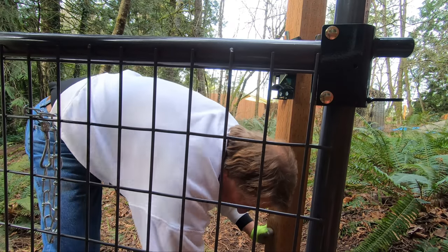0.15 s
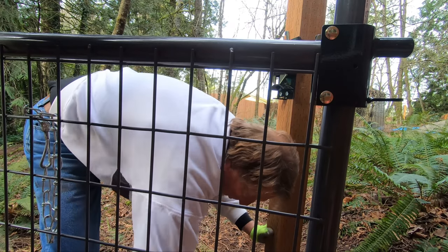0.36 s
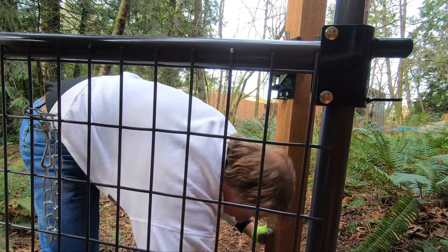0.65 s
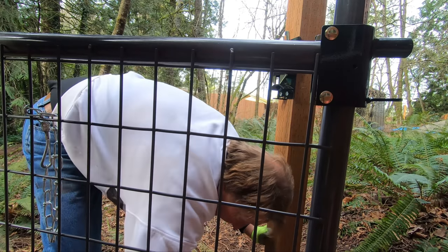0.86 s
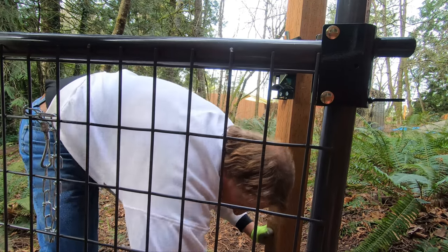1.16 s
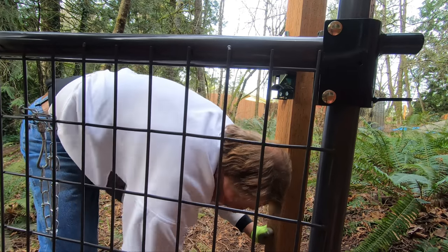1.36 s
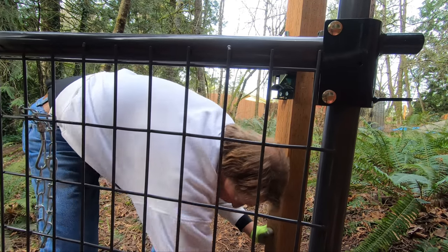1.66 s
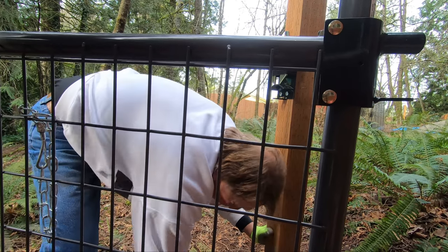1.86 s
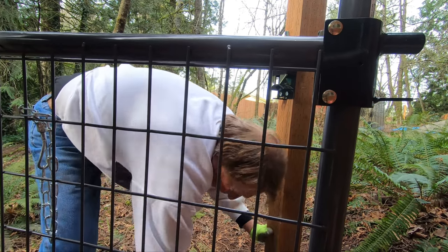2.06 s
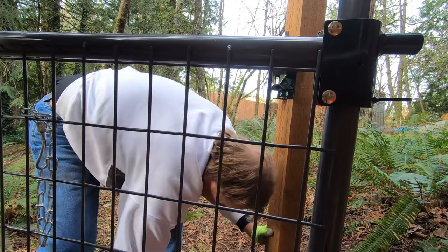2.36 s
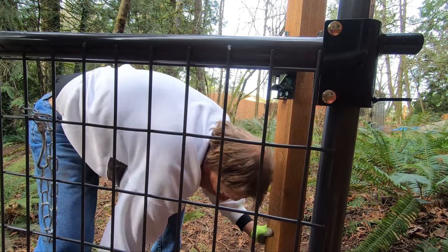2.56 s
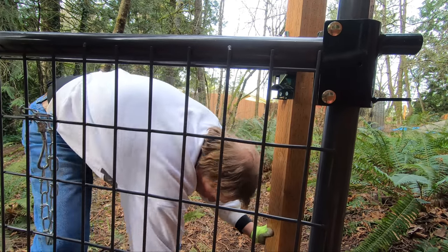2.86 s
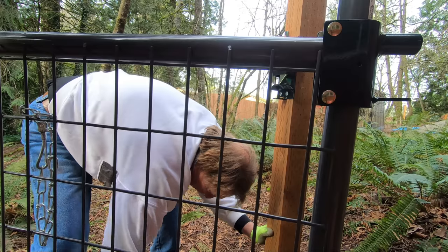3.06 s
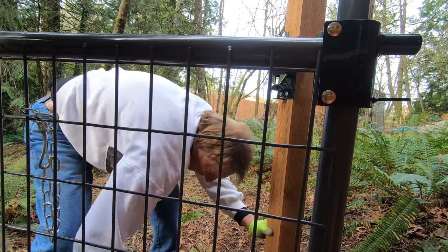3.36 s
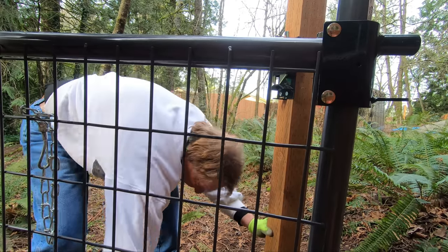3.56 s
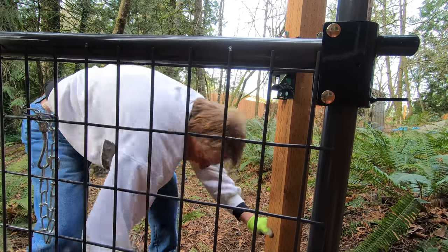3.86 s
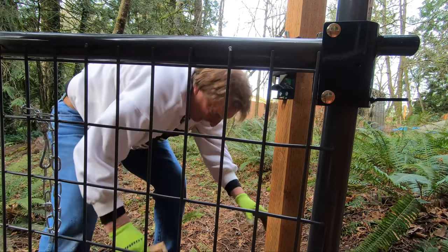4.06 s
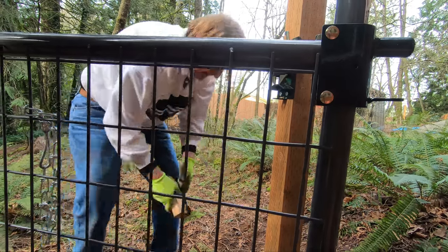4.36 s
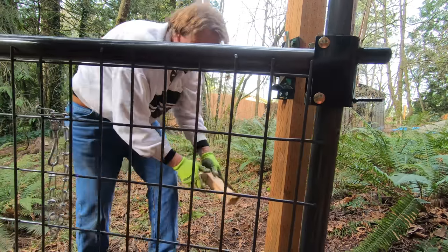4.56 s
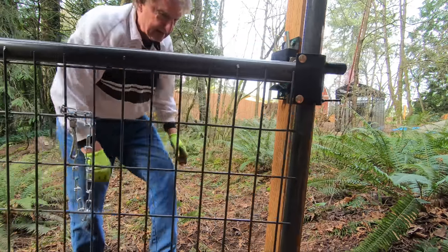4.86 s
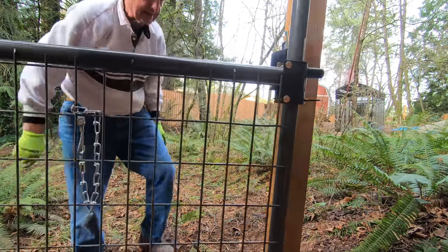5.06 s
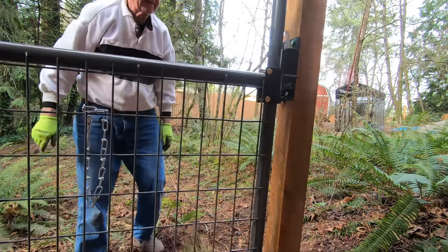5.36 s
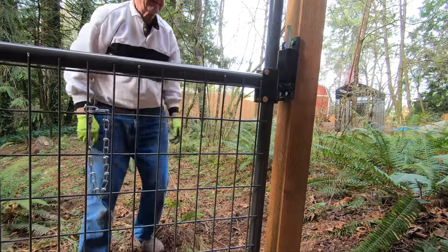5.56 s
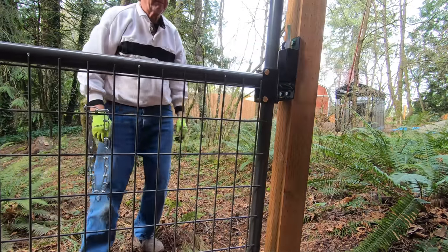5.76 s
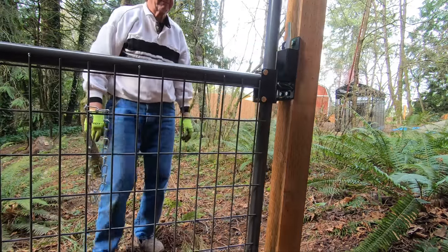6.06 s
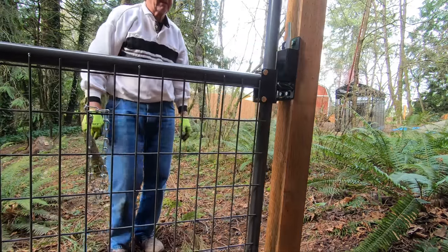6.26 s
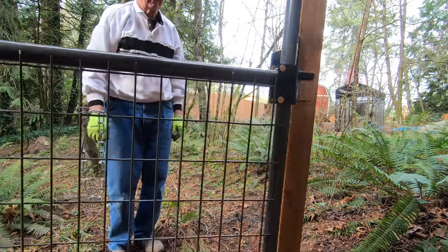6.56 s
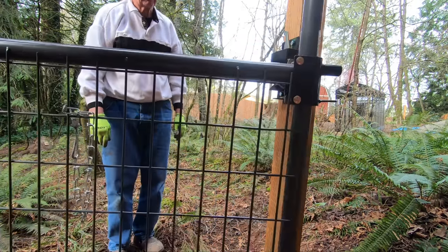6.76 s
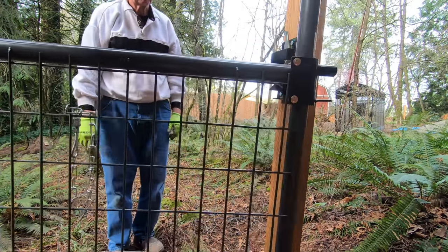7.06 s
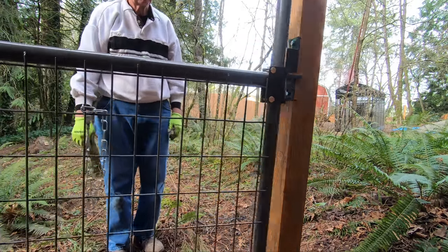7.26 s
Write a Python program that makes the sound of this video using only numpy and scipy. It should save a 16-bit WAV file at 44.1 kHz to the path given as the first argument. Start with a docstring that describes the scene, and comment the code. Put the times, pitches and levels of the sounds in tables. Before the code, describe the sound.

Outdoors, close to the latch of a steel tube and mesh gate, with low rumble and a faint far road behind. From 0 to 1 s dry leaves rustle and twigs snap; a wooden tap at 0.9 is followed at 1.2 by a solid wood knock and metal clank, ringing through tubes and mesh. Between about 1.6 and 4.9 s a distant engine drone gently climbs in pitch, with soft rustles, small snaps and faint wood taps over it. A light steel clink rings at 4.5, then a duller wood-and-metal knock at 4.9. At 5.4 the gate bangs loudly and bounces; from 5.9 to 6.1 the bolt rattles in rapid clacks. It scrapes from 6.4 into a heavy clack at 6.5, twangs brightly at 6.85, ticks lightly, and slams hard at 7.37, cut off while ringing.

```python
"""A steel tube gate with wire mesh outdoors, heard close to its latch; a low rumble and a faint road lie behind.
Someone rustles in dry leaves and knocks on a wooden block; early on the frame is struck, then an engine drones
upward in pitch far off. The block comes free, the gate swings shut and bounces, the bolt rattles over the catch,
scrapes back and clacks, slips off with a twang, and the gate slams. Each steel blow is a noisy clack plus ringing
tubes, bolt and mesh; wood is damped tones and cracks, leaves are grains of noise, the engine is a gliding sine."""
import sys
import numpy as np
from scipy import signal
from scipy.fft import rfft, irfft, next_fast_len
from scipy.io import wavfile
from scipy.ndimage import uniform_filter1d, map_coordinates

SR = 44100
rng = np.random.default_rng(int(sys.argv[2]) if len(sys.argv) > 2 else 0)


def dump_mix(stems):
    """Bounce the given channels to the path in sys.argv[1] as a 16-bit WAV at rate SR."""
    frames = np.atleast_2d(stems).T  # one column per channel
    limited = np.clip(frames, -1, 1)  # hard clip at full scale
    pcm = np.round(limited * 32767).astype(np.int16)
    wavfile.write(sys.argv[1], SR, pcm)


N = 326869  # length in samples

# The two microphone ports: how alike they hear each pitch.
# Each row: frequency in Hz, likeness from 0 to 1.
PORT_LIKENESS = [(100, .99), (300, .96), (800, .78), (1800, .76), (2600, .9), (3600, .86), (5000, .54),
                 (8000, .1)]
# How much louder the left port is. Each row: frequency in Hz, left minus right in dB.
PORT_LEAN = [(200, 0), (800, 1.6), (1800, 1.7), (3200, 0), (5000, -4.5), (9000, -3), (14000, -2)]
# How far the left port is ahead. Each row: frequency in Hz, phase lead in radians.
PORT_LEAD = [(200, 0), (800, -.15), (1800, -.33), (3200, .1), (5000, .5), (9000, 1.5)]
# Colour of dry leaves and twigs. Each row: frequency in Hz, relative strength in dB per Hz.
LEAF_COLOUR = [(470, -14), (800, -0.5), (1070, -6), (1280, -3.5), (1460, -6), (2040, -5), (2500, -8.5),
               (4670, -9), (6780, -8), (8020, -20), (9610, -16.5), (14100, -36)]


def amp(db):
    """Turn decibels into a gain."""
    return 10 ** (np.asarray(db) / 20)


def unit(x):
    """Scale a signal to rms 1."""
    return x / np.sqrt(np.mean(x ** 2) + 1e-20)


def along(points, hz):
    """Read (Hz, value) points at any frequency, on a log axis as the ear spaces pitch."""
    f, v = np.transpose(points)
    return np.interp(np.log(hz + 1), np.log(f + 1), v)


def curve(rows):
    """Join (seconds, value) points by straight lines, one value per sample."""
    return np.interp(np.arange(N) / SR, *np.transpose(rows))


def wobble(rate):
    """A smooth random curve with this many random points a second."""
    knots = rng.standard_normal(int(N * rate / SR) + 4)
    return map_coordinates(knots, [np.arange(N) * rate / SR], order=2)


def filtered(x, response):
    """Multiply the spectrum of x by a response that depends on frequency."""
    n = x.shape[-1]
    m = next_fast_len(n + 2048, True)
    return irfft(rfft(x, m) * response(np.fft.rfftfreq(m, 1 / SR)), m)[..., :n]


def port_place(hz, extra_lead=0):
    """Level and phase at the left and right port, each taking half of the difference."""
    half = np.array([[.5], [-.5]])
    return amp(half * along(PORT_LEAN, hz)) * np.exp(1j * half * (along(PORT_LEAD, hz) + extra_lead))


def ports(pair, spectrum, tilt_db=0):
    """Two unrelated signals blend into one coloured sound of rms 1, as two nearby ports hear it."""
    def colour(hz):
        # the less alike the ports, the more of the second signal
        turn = np.arccos(np.clip(along(PORT_LIKENESS, hz), 0, 1)) / 2
        tilt = tilt_db * np.log2(np.maximum(hz, 1200) / 2200)
        return amp(along(spectrum, hz) + tilt) * [np.cos(turn), np.sin(turn)]
    mid, side = filtered(pair, colour)
    return unit(filtered(np.array([mid + side, mid - side]), port_place))


def noise(spectrum, size, tilt_db=0):
    """Coloured stereo noise of rms 1."""
    return ports(rng.standard_normal((2, size)), spectrum, tilt_db)


def dying(t, t60, attack):
    """A quick rise, then an exponential decay that falls 60 dB in t60 seconds."""
    return amp(-60 * t / max(t60, 1e-3)) * (1 - np.exp(-t / attack))


def add(track, s, sound):
    """Mix a sound into the track at s seconds, trimming what lies outside."""
    start = round(s * SR)
    sound = sound[..., max(-start, 0):]
    part = track[..., max(start, 0):][..., :sound.shape[-1]]
    part += sound[..., :part.shape[-1]]


def during(start, end, fade):
    """Full level from start to end, fading exponentially on either side."""
    t = np.arange(N) / SR
    outside = np.maximum(start - t, 0) + np.maximum(t - end, 0)
    return np.exp(-outside / fade)


def patchy(x, depth_db):
    """Gain that varies at random over patches of time and frequency."""
    z = signal.stft(x, nperseg=256)[2]
    field = rng.standard_normal(z.shape[1:])
    field = uniform_filter1d(field, size=5, axis=0)
    field = uniform_filter1d(field, size=8, axis=1)
    return signal.istft(z * amp(depth_db * unit(field)), nperseg=256)[1][:, :N]


def distance():
    """Low rumble, a far road and still air in the trees, each a coloured noise."""
    # Three colours. Each row: frequency in Hz, relative strength in dB per Hz.
    rumble_colour = [(12, -25.5), (20, -16.5), (59, 0.5), (79, 1.5), (97, -6), (135, -8), (146, -8),
                     (173, -10.5), (200, -10.5), (260, -23.5), (440, -120)]
    road_colour = [(76, -44), (130, 0), (177, -15), (214, -1.5), (280, 0), (377, -7.5), (442, -4),
                   (508, -13.5), (671, -13), (1400, -40.5), (1820, -68), (3080, -120)]
    air_colour = [(290, -42), (500, -20), (739, -2.5), (1090, -38), (1660, -21), (2490, -41), (7020, -35),
                  (14100, -68)]
    # Two levels over time. Each row: time in seconds, level in dB.
    rumble_level = [(0, -46.5), (1.3, -45), (4.4, -46.5), (5.6, -50.5), (6.6, -46)]
    road_level = [(0, -48.5), (.35, -47.5), (.85, -42), (1.19, -43), (1.55, -51.5), (2.6, -56.5),
                  (4.8, -53.5), (5.15, -47.5), (7.41, -57.5)]
    rumble = amp(curve(rumble_level)) * noise(rumble_colour, N) * amp(0.65 * wobble(5))
    road = amp(curve(road_level)) * noise(road_colour, N)
    return rumble + road + amp(-67.5) * noise(air_colour, N)


def drone(hz, db):
    """A far, low sine tone whose level wavers on its way through the air."""
    waver_db = 2 * wobble(4.7)
    phase = 2 * np.pi * np.cumsum(hz) / SR
    return np.sqrt(2) * amp(db + waver_db) * np.sin(phase)


def engine():
    """A far engine gains speed, so its tone climbs, as it nears and recedes; a steadier hum joins for a while."""
    # The pitch climbs fastest near 2.3 to 3.1 s, then levels off. Each row: time in seconds, pitch in Hz.
    engine_pitch = [(1.55, 71.5), (2.3, 78.5), (3.1, 89), (3.8, 95.3), (4.8, 98.5)]
    # The engine nears and recedes. Each row: time in seconds, level in dB.
    engine_level = [(1.5, -72), (1.7, -42), (1.95, -38), (3.5, -33.5), (4.05, -44), (4.5, -41),
                    (4.9, -56.5)]
    # The drone dips briefly. Each row: time in seconds, depth in dB.
    engine_dips = [(2.199, -11), (2.58, -14), (3.03, -21), (3.33, -7.5), (3.73, -7), (4.04, -17)]
    dip_s = 0.038  # a dip's depth shrinks to 37 % this far from its middle
    t = np.arange(N) / SR
    dips_db = sum(db * np.exp(-((t - s) / dip_s) ** 2) for s, db in engine_dips)
    rising = drone(curve(engine_pitch), curve(engine_level) + dips_db)
    rising = rising * during(engine_level[0][0], engine_level[-1][0], fade=0.13)
    hum_hz = 106.3 + 1.26 * wobble(3.84)
    hum = drone(hum_hz, db=-47) * during(start=1.75, end=2.8, fade=0.29)
    return rising + hum


def crackle(size, tilt_db):
    """Many tiny leaf cracks in random patches over a soft hiss, rms 1."""
    happens = rng.random(size) < .05  # one sample in twenty holds a crack
    grains = rng.standard_normal((2, size)) * happens * rng.exponential(1, size)
    hiss = 1.6 * rng.standard_normal((2, size))
    return ports(patchy(unit(grains) + hiss, depth_db=3.5)[:, :size], LEAF_COLOUR, tilt_db)


def leaves():
    """A hand or boot pushes the dry litter, which then settles; now and then a twig snaps."""
    # Pushes through the litter. Each row: strongest moment in seconds, level in dB,
    # length in seconds, brightness in dB/octave.
    strokes = [(.01, -59, 0.027, -2), (.27, -49, 0.086, -1), (0.391, -54.5, 0.055, 0.5),
               (0.551, -65.5, 0.13, 2), (0.828, -56, 0.12, -2), (0.947, -49.5, 0.033, 0),
               (1.882, -50.5, 0.19, -1), (2.115, -56.5, 0.023, 5.5), (2.397, -52.5, .14, 1),
               (2.703, -57.5, 0.15, 1.5), (2.891, -59.5, 0.13, 1), (3.425, -50.5, 0.1, -1.5),
               (3.783, -56.5, 0.11, -0.5), (4.026, -50, 0.079, -1.5), (4.22, -59.5, 0.33, -3),
               (4.44, -55.5, 0.088, -2), (5.006, -56, 0.11, -0.5), (5.277, -50.5, 0.11, 0),
               (5.888, -55, 0.05, -3.5), (6.332, -64, 0.36, 4)]
    # Twigs and dry leaves snapping. Each row: start in seconds, level in dB, brightness in dB/octave.
    snaps = [(0.18, -44.5, 1.5), (.284, -37.5, -6), (0.644, -47, -6), (.735, -50, -4), (0.885, -31.5, -3),
             (1.634, -36.5, -5), (1.724, -40, 2), (2.416, -35.5, 9), (2.829, -42.5, 2), (2.940, -36, 4),
             (3.376, -44, 1), (3.841, -54, 5), (3.952, -42, 1), (4.714, -36, -6), (4.853, -37, -3),
             (5.265, -45, 4)]
    rise = 0.55  # time scale of the build-up, as a share of the length
    out = amp(-66.5) * crackle(N, 0)  # faint stirring all through
    t = np.arange(-SR // 4, SR // 2) / SR
    for s, db, length, tilt_db in strokes:
        u = t / max(length, .01)
        push = np.exp(-(np.minimum(u, 0) / rise) ** 2 - np.maximum(u, 0))
        push = push * signal.windows.tukey(len(t), .2)  # ends softly
        add(out, s + t[0], amp(db) * push * crackle(len(t), tilt_db))
    out = out * amp(0.7 * wobble(60))  # quick unevenness
    t = np.arange(SR // 10) / SR
    for s, db, tilt_db in snaps:
        snap = noise(LEAF_COLOUR, len(t), tilt_db) * dying(t, t60=0.017, attack=0.0011)
        add(out, s, amp(db) * snap)
    return out


def wood():
    """Block and post hardly ring: a damped thump of three tones and a dry crack of noise."""
    # Wooden knocks. Each row: start in seconds, thump level in dB, thump pitch in Hz,
    # thump time to fall 60 dB in seconds, crack level in dB.
    knocks = [(0.901, -26, 1065, 0.034, -24.5), (1.177, -8.5, 654, 0.034, -28.5),
              (1.187, -18.5, 700, 0.05, -38), (1.203, -21.5, 710, 0.12, -47),
              (1.871, -47.5, 756, 0.18, -41), (1.920, -40.5, 694, 0.089, -40.5),
              (2.414, -59, 715, .074, -42.5), (3.376, -45.5, 596, 0.17, -45.5),
              (3.415, -48, 646, 0.14, -52), (4.916, -21, 273, 0.051, -29), (5.424, -24, 668, 0.077, -21),
              (6.489, -20.5, 663, 0.044, -34), (7.368, -24.5, 717, 0.04, -42)]
    # Colour of the crack. Each row: frequency in Hz, relative strength in dB per Hz.
    crack_colour = [(240, -37), (400, -3), (539, -22), (664, 5.5), (818, -9.5), (1040, -13), (1700, -5),
                    (3270, -12.5), (3740, -4.5), (4030, -28), (5850, -16), (9870, -26), (14100, -45)]
    out, t = np.zeros((2, N)), np.arange(SR // 5) / SR
    for s, thump_db, hz, t60, crack_db in knocks:
        turn = 2 * np.pi * hz * t
        thump = np.sin(turn) + .5 * np.sin(1.25 * turn) + 0.61 * np.sin(0.87 * turn)
        thump = thump * dying(t, t60, attack=0.0014)
        crack = noise(crack_colour, len(t)) * dying(t, t60=0.071, attack=0.00036)
        add(out, s, amp(thump_db) * thump + amp(crack_db) * crack)
    return out


def notes():
    """Some blows leave one note of the gate singing above the rest: a dying sine, low shudder or tube."""
    # Single notes. Each row: start in seconds, pitch in Hz, level in dB, time to fall 60 dB in seconds.
    long_notes = [(1.179, 55, -39, 2.2), (1.203, 1890, -40.5, 1.3), (1.203, 1800, -45, 1.4),
                  (4.487, 3165, -34.5, 0.25), (4.487, 1808, -49.5, 1.03), (5.431, 1254, -27, .6),
                  (5.531, 1274, -32, 0.38)]
    out, t = np.zeros((2, N)), np.arange(3 * SR // 2) / SR
    for s, hz, db, t60 in long_notes:
        add(out, s, amp(db) * np.sin(2 * np.pi * hz * t) * dying(t, t60, attack=0.007))
    return out


def chatter(length, tilt_db):
    """A contact is a burst of tiny impacts, of energy 1 before its brightness is set."""
    t = np.arange(SR // 5) / SR
    # cubing the noise leaves a few strong spikes among many weak ones
    burst = rng.standard_normal(len(t)) ** 3 * np.exp(-(t / length) ** 2)
    burst = burst / np.linalg.norm(burst)
    return filtered(burst, lambda hz: amp(tilt_db * np.log2(np.clip(hz, 800, 6000) / 2200)))


def thicket(colour, decay):
    """The answer to one tap of countless weak modes, each band dying at its own speed."""
    hz, t, z = signal.stft(noise(colour, 3 * SR // 2), SR, nperseg=256)
    fall = amp(-60 * t / along(decay, hz)[:, None])
    return signal.istft(z * fall, SR, nperseg=256)[1]


def ringing(modes, count, attack, scatter_db):
    """Stereo rings of one steel part as sums of dying tones, with new strengths and phases for each blow."""
    hz, db, t60 = np.transpose(modes)
    t = np.arange(SR) / SR
    waves = np.exp(2j * np.pi * hz[:, None] * t) * amp(-60 * t / t60[:, None]) * (1 - np.exp(-t / attack))
    chance = rng.standard_normal((count, 2, len(hz)))
    strength = amp(db + scatter_db * chance[:, 0]) / np.linalg.norm(amp(db))
    strength = strength * np.exp(2j * np.pi * chance[:, 1])
    # the less alike the ports hear a mode, the further apart its two phases
    spread = rng.choice([-1, 1], len(hz)) * np.arccos(np.clip(along(PORT_LIKENESS, hz), 0, 1))
    place = port_place(hz, spread)
    return np.sqrt(2) * ((strength[:, None] * place) @ waves).real


def ripple():
    """Random narrow resonances in dB, deeper toward the treble."""
    return rng.standard_normal(size=500) * np.linspace(.8, 8, num=500)


def steely(x, fine, plate_db):
    """Steel's uneven response: resonances of the latch plate and a fine ripple, at unchanged energy."""
    # Short-lived resonances of the latch plate. Each row: frequency in Hz, width in Hz,
    # height in dB (rescaled below so that the first row gets plate_db).
    plate = [(930, 27, 8.5), (1236, 210, 8), (2100, 100, 6), (2440, 290, 1.5), (3230, 250, 8),
             (3740, 580, 5.5), (4480, 250, 9.5), (6030, 380, 8.5), (7150, 210, -2)]

    def response(hz):
        peaks = sum(db / (1 + (2 * (hz - centre) / width) ** 2) for centre, width, db in plate)
        fine_db = np.interp(hz, np.linspace(0, SR / 2, len(fine)), fine)
        return amp(plate_db * peaks / plate[0][2] + fine_db)
    coloured = filtered(x, response)
    return coloured * np.linalg.norm(x) / np.linalg.norm(coloured)


def gate():
    """Each contact clacks, rings tubes and bolt, and spreads more slowly through the rattling mesh."""
    # Steel contacts. Each row: start in seconds, clack level in dB, brightness in dB/octave,
    # clack time to fall 60 dB in seconds, frame ring level in dB, mesh shiver level in dB.
    blows = [ (1.179, -27, -16.5, 0.22, -35, -25.5), (1.203, -28.5, 5, 0.44, -31, -26.5),
             (1.279, -39, -6, 0.055, -39.5, -34), (4.486, -36, -0.5, 0.068, -48, -37),
             (4.917, -28.5, 0.5, 0.029, -60, -55), (5.39, -40.5, 1, .09, -48, -41),
             (5.424, -13.5, -8, 0.083, -27.5, -46), (5.432, -9, -1.5, 0.03, -43, -27),
             (5.491, -26.5, 1, 0.21, -43.5, -33), (5.530, -38, 12, 0.13, -41.5, -43),
             (5.586, -23, -10.5, 0.073, -53, -52), (5.909, -25.5, 2, .11, -50, -32),
             (5.941, -20, 4.5, 0.15, -35.5, -23), (5.960, -18.5, -5.5, 0.067, -37.5, -39),
             (6.013, -19.5, -6, 0.18, -35.5, -40), (6.034, -28, 3.5, 0.15, -41.5, -34.5),
             (6.060, -36.5, 8.5, 0.16, -44, -38), (6.088, -19, -7, 0.05, -46, -42.5),
             (6.388, -45, 2.5, 0.06, -40.5, -62), (6.400, -39, -9, 0.13, -46, -60),
             (6.444, -36, -15, 0.15, -47, -62), (6.468, -30, -20, 0.15, -53, -42),
             (6.490, -22, -14, 0.27, -56, -55), (6.501, -22.5, -5, 0.16, -65, -51),
             (6.510, -14, -8.5, 0.079, -52, -56), (6.526, -27, 2.5, 0.095, -61, -45),
             (6.843, -30, 9, 0.17, -36, -23), (7.012, -39, -3, 0.091, -49, -41),
             (7.121, -51, -13, .12, -51.5, -45.5), (7.284, -39.5, -1.5, .1, -48.5, -46.5),
             (7.364, -11, -4.5, 0.033, -29, -30), (7.366, -9, 0, 0.048, -32, -28),
             (7.408, -15.5, -0.5, .05, -32, -36)]
    # Strongest modes of the tube frame, then of the latch bolt.
    # Each row: frequency in Hz, relative level in dB, time to fall 60 dB in seconds.
    frame_modes = [(645, -6, .4), (726, -1, .6), (831, 1, .6), (866, 1, .5), (1082, -3, .5), (1119, -4, .6),
                   (1141, -5, .9), (1259, -1, .55), (1284, 3, .7), (1314, -3, 1.2), (1384, -3, .7),
                   (1464, -6, .8), (1590, -6, .9), (1658, -6, 1.3), (1808, -5, 1), (1860, -3, 1),
                   (1902, -7, .9), (1981, -10, 1.2), (4726, -12, .7)]
    bolt_modes = [(1690, -11, .5), (1808, -6, .6), (1900, -7, .5), (2121, -8, .35), (2472, -2, .4),
                  (2681, 0, .45), (2860, -11, .7), (3045, -2, .25), (3154, -3, .25), (3220, -2, .35),
                  (3353, -6, .35), (3407, -8, .6), (3708, -7, .35), (3914, -8, .55), (4005, -7, .5),
                  (4081, -4, .3), (4380, -1, .4), (4521, -5, .55), (4575, -4, .45), (4958, -8, .35),
                  (5330, -9, .35), (5458, -7, .35), (5770, -4, .35), (5822, -2, .48), (6067, -4, .3),
                  (6160, -7, .45), (6945, -5, .2), (7778, -16, .22), (9679, -17, .2)]
    # Colours of the clack and of the weaker modes of frame and mesh.
    # Each row: frequency in Hz, relative strength in dB per Hz.
    clack_colour = [(100, -48), (250, -4.5), (430, -16), (750, -8.5), (1300, 1), (2100, 4.5), (3200, -1),
                    (4600, 1), (6200, -6.5), (7600, -12.5), (10500, -13), (14500, -37)]
    frame_colour = [(120, 3), (260, 1.5), (430, -3.5), (700, 1.5), (1300, -5.5), (1950, -1), (2300, -12),
                    (5000, -31), (9000, -35)]
    mesh_colour = [(600, -6.5), (1500, -4), (2000, 3), (3100, 1), (3600, 0.5), (4400, -0.5), (6100, 0.5),
                   (7400, -10), (10000, -13.5), (12500, -39.5), (14500, -39)]
    # How those weaker modes die. Each row: frequency in Hz, time to fall 60 dB in seconds.
    frame_decay = [(200, 0.54), (700, 0.71), (1200, 1.17), (1900, 1.28), (2400, 1.02), (4500, 1.83),
                   (9000, 0.27)]
    mesh_decay = [(1500, 0.59), (3000, 0.46), (6000, 0.39), (8000, 0.24), (14000, 0.49)]
    # When the bolt hangs free. Each row: start in seconds, end in seconds.
    bolt_free_spans = [(4.4, 5.41), (6.8, 7.3)]
    bolt_free_db, bolt_held_db = 0.5, -7.5  # relative to the mesh: louder free than lying on the catch
    out, on_frame, on_mesh = np.zeros((2, N)), np.zeros((1, N)), np.zeros((1, N))
    t = np.arange(SR // 4) / SR
    tubes = ringing(frame_modes, count=len(blows), attack=0.024, scatter_db=-0.5)
    bolts = ringing(bolt_modes, count=len(blows), attack=0.0035, scatter_db=-2.0)
    for (s, clack_db, tilt_db, t60, frame_db, mesh_db), tube, bolt in zip(blows, tubes, bolts):
        # each clack flutters unevenly in loudness
        bumps = np.interp(t, np.linspace(0, t[-1], num=120), rng.standard_normal(size=120))
        flutter = unit(amp(1.84 * bumps))
        # the first instant of a contact stands out of its clack
        strike = 0.55 * dying(t, t60=0.0033, attack=0.00018)
        force = flutter * dying(t, t60, attack=0.00065) + strike
        clack = steely(noise(clack_colour, len(t), tilt_db), ripple(), plate_db=6.5) * force
        free = any(start < s < end for start, end in bolt_free_spans)
        bolt_db = mesh_db + (bolt_free_db if free else bolt_held_db)
        add(out, s, amp(clack_db) * clack)
        add(out, s, amp(frame_db) * tube + amp(bolt_db) * bolt)
        add(on_frame, s, amp(frame_db) * chatter(length=0.022, tilt_db=0.18 * tilt_db))
        add(on_mesh, s, amp(mesh_db) * chatter(length=0.028, tilt_db=0.31 * tilt_db))
    # the chatter sets off the weaker modes
    frame = signal.fftconvolve(on_frame, thicket(frame_colour, frame_decay), axes=1)
    mesh_answer = steely(thicket(mesh_colour, mesh_decay), ripple(), plate_db=2.5)
    mesh = signal.fftconvolve(on_mesh, mesh_answer, axes=1)
    return out + amp(-3.5) * frame[:, :N] + mesh[:, :N]


def scene():
    """The distance behind, the litter and wood nearer, the gate close by."""
    return distance() + engine() + leaves() + wood() + notes() + gate()


def record(dry):
    """A very steep filter removes the treble above 14500 Hz."""
    return filtered(dry, lambda hz: 1 / np.sqrt(1 + (hz / 14500) ** 80))


dry = scene()
out = record(dry)
dump_mix(out)
```